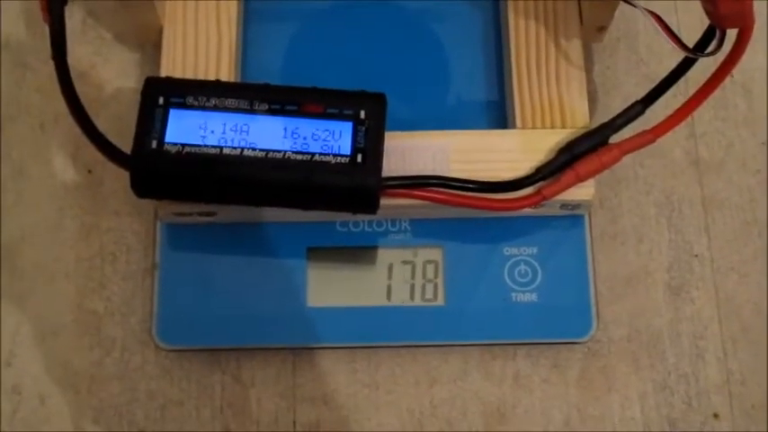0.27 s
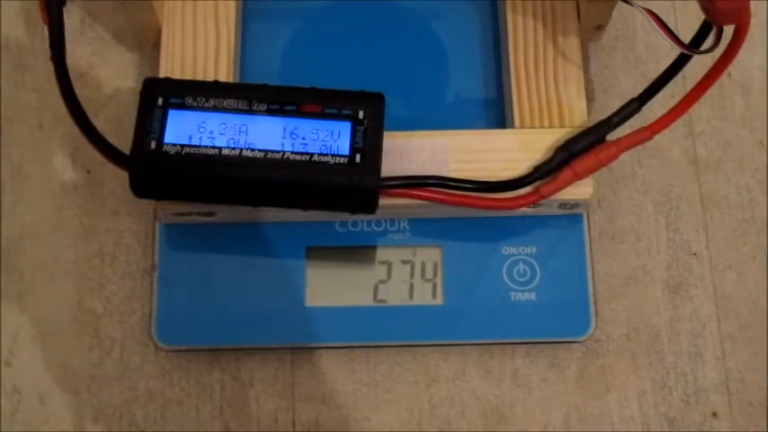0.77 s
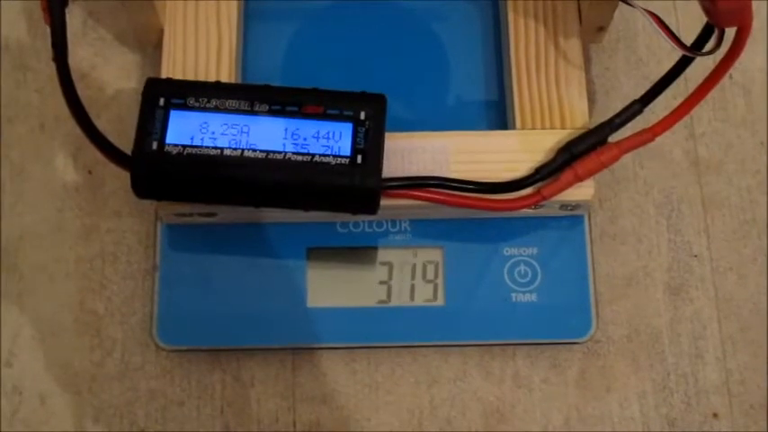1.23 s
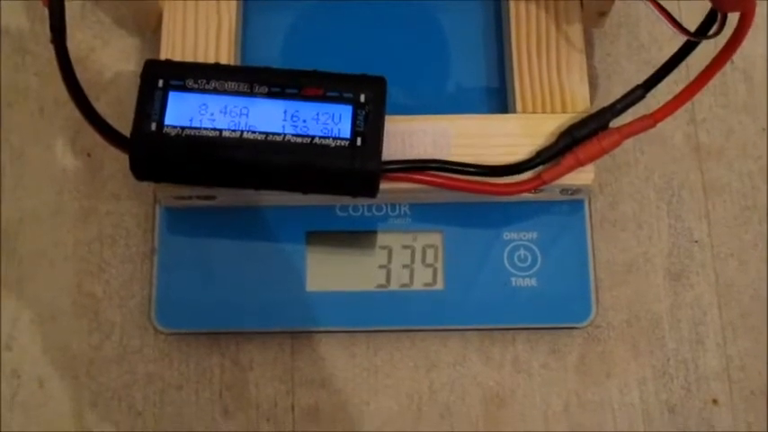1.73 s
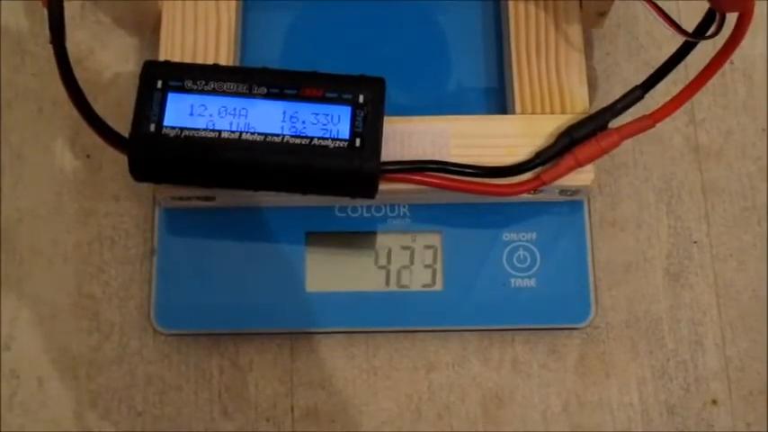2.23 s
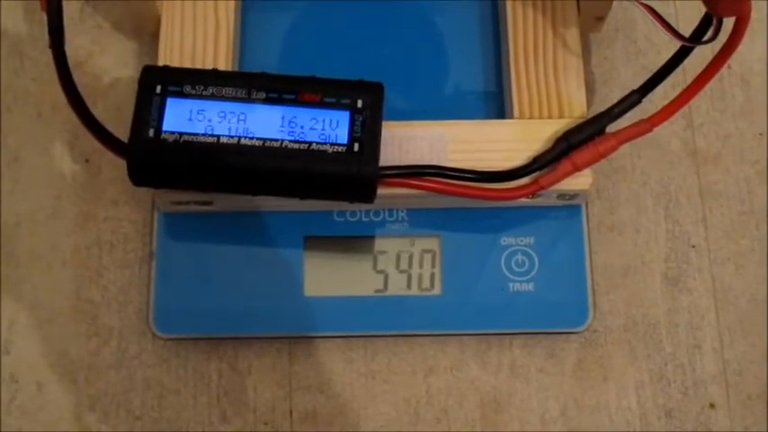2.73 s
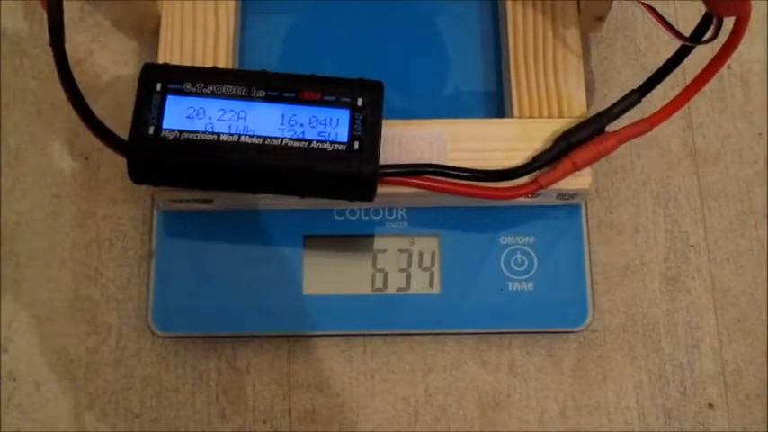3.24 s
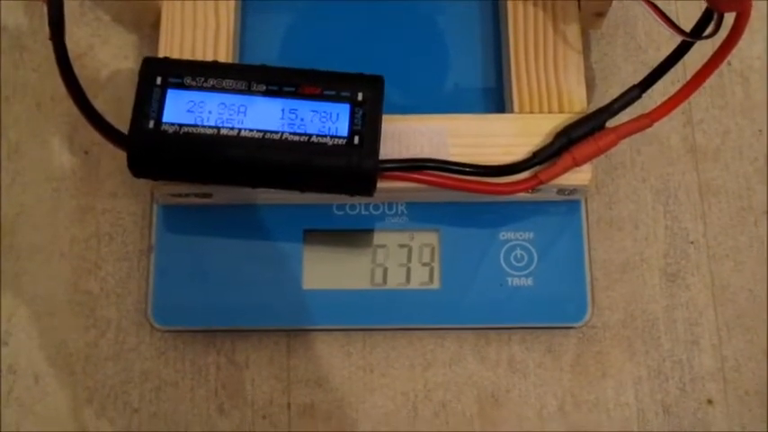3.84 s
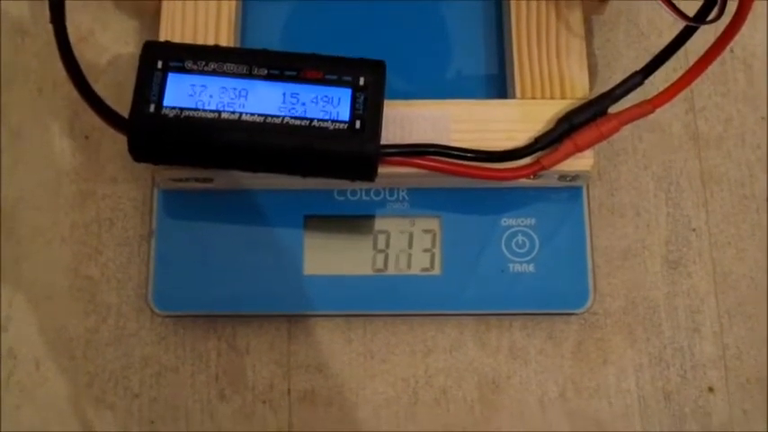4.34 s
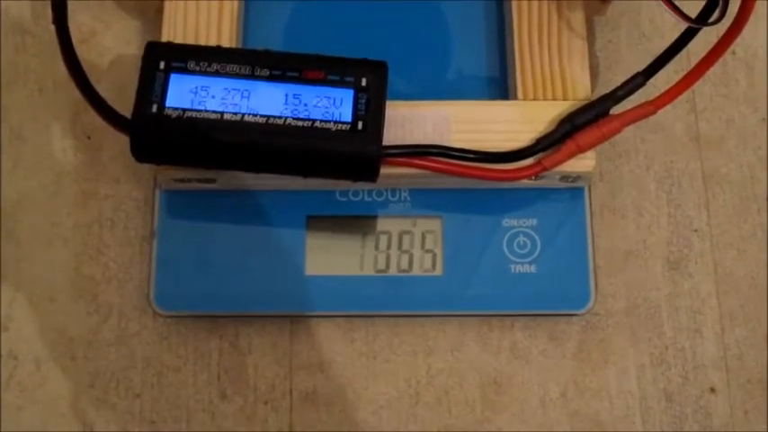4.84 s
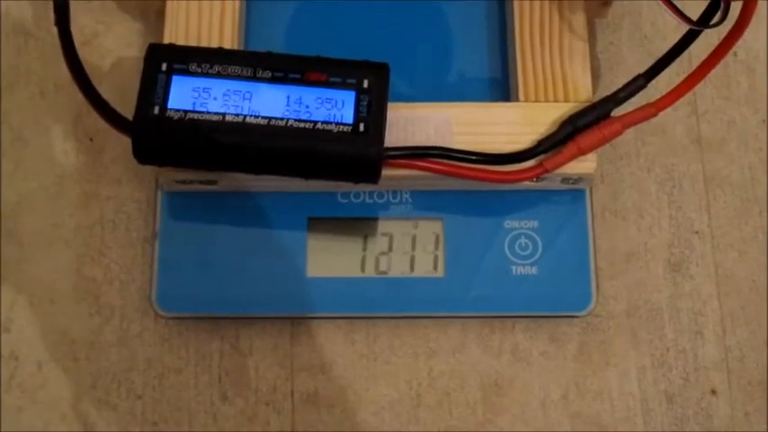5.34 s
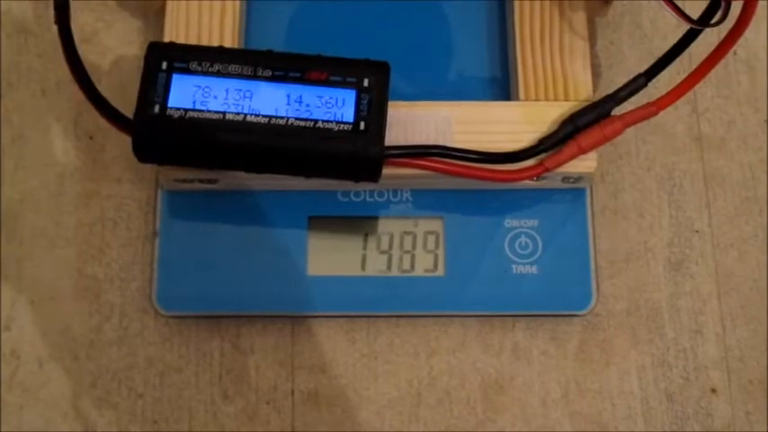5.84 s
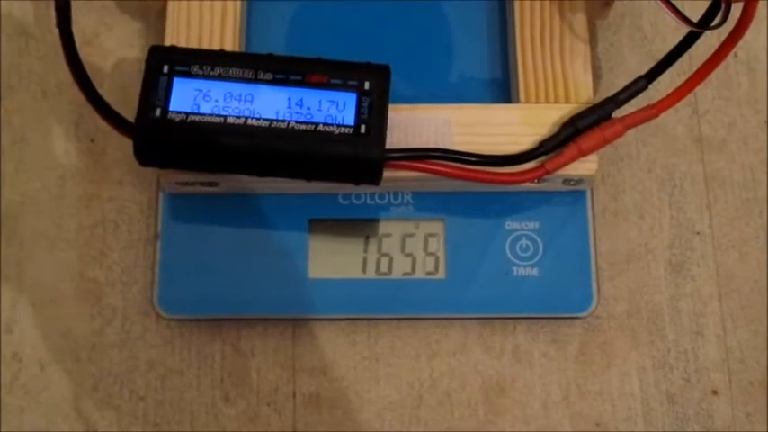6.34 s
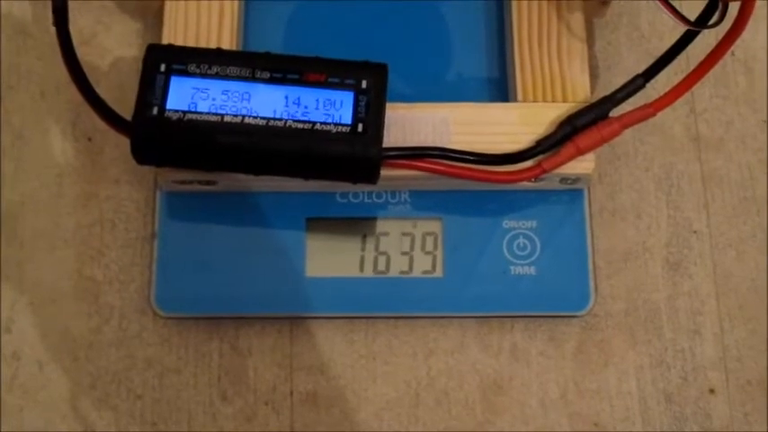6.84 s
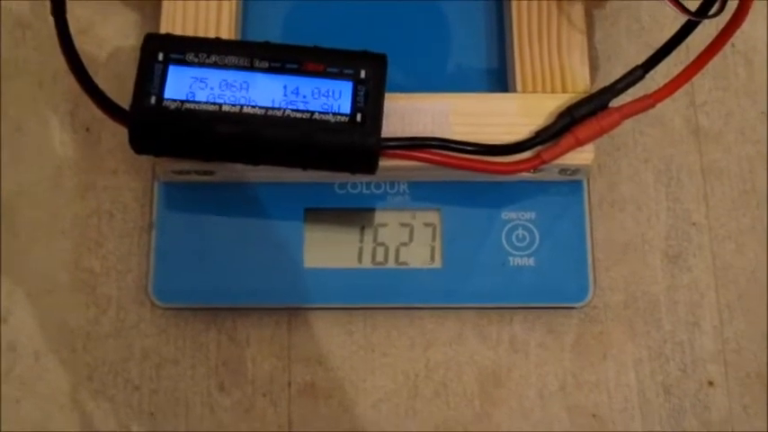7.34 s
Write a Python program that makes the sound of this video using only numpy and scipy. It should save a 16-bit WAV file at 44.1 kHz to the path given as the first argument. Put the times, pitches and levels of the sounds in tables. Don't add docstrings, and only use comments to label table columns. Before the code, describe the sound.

Close, loud sound of a small fan motor being throttled up by an uneven hand. A nasal whine with broadband air hiss lingers low while the stand chatters harshly, then sweeps upward, wavering and briefly thinning as reflections cancel the tone. From about five and a half seconds it stays at full speed, a hard shrill whine over rushing air, with no wind-down. Practically mono, little sense of the room.

```python
import sys
import numpy as np
from scipy import signal
from scipy.io import wavfile
from scipy.ndimage import uniform_filter1d

SR = 44100
rng = np.random.default_rng(int(sys.argv[2]) if len(sys.argv) > 2 else 0)


def linear_from_db(decibels):
    return 10 ** (np.asarray(decibels, float) / 20)


def unload_audio(sound):
    columns = np.transpose(np.atleast_2d(sound))
    steps = np.round(np.clip(columns, -1, 1) * 32767)
    wavfile.write(sys.argv[1], SR, steps.astype(np.int16))


N = 335160

# time [s], shaft speed [Hz], gain of the airflow noise [dB].
ROTOR = [(0, 378, 0.5), (.22, 406, 1), (.52, 432.7, 1.5), (.9, 441.3, 3), (1.24, 442.9, 2.5),
         (1.39, 476.2, 3), (1.56, 483.2, 0.5), (1.72, 502.7, 1.5), (2.36, 593, -1), (2.62, 611.3, -0.5),
         (3.15, 627, 0), (3.84, 728, 0), (4.41, 803.6, 0), (5.06, 868, 0), (5.51, 992, 1.5),
         (6.0, 994.2, 1), (7.22, 984, 1), (7.6, 991, 1)]
# time [s], shaft speed ahead or behind [Hz], half length [s].
NUDGES = [(.08, -4, 0.075), (.36, -2, 0.084), (1.88, -5, 0.11), (2.07, 3, 0.099), (2.25, -6, 0.092),
          (2.88, -5, 0.18), (3.42, -7, .1), (3.6, 5, .1), (3.98, -3, 0.094), (4.68, 2, 0.0945),
          (4.8, -5, .1), (5.2, -8, .15), (5.41, -8, 0.086), (6.3, -2, 0.19)]
# shaft speed [Hz], shaft multiples 5 and 10 [dB].
BLADE = [(378, -25, -18.5), (390, -21, -33), (413, -16, -32), (448, -17.5, -35), (505, -17.5, -27.5),
         (565, -12, -36), (616, -14.5, -34), (700, -17, -24.5), (849.6, -15.5, -20.5), (949.3, -14.5, -27),
         (982, -13, -19), (991, -13, -19.5), (1003, -1, -41)]
# shaft speed [Hz], level [dB].
THIRD_BLADE = [(378, -36), (400, -28), (425, -31), (440, -36), (595, -45), (625, -35), (832, -31),
               (960, -41), (985, -31), (995, -33)]
# shaft speed [Hz], multiples 2 and 3 from the frame [dB],
# 4 from uneven blades [dB], 7 from the mount [dB].
SHAKE = [(378, -42, -43, -37, -38), (493, -46, -28, -34.5, -34), (545, -39, -40, -30.5, -50),
         (613, -33.5, -41, -27.5, -47), (611, -33, -51, -26.5, -46), (625, -39, -48, -30.5, -41),
         (647, -37, -35, -32.5, -42), (796, -44, -49, -33, -45), (904, -44, -28, -31, -44),
         (984, -37.5, -37, -25, -45), (997, -35, -32, -26.5, -47)]
# shaft multiple, leading multiple, level relative to it [dB].
RIDERS = [(6, 4, -2), (8, 3, -10), (9, 10, -15), (11, 10, -15), (12, 10, -22), (13, 7, -19), (14, 15, -10),
          (16, 7, -18), (20, 15, -13)]
# time [s], depth [dB], half length [s].
NULLS = [(0.13, -15, 0.039), (0.242, -11, 0.05), (.45, -3, 0.049), (0.532, -4, 0.024), (0.665, -5, .05),
         (1.345, -6.5, 0.13), (1.483, -6, 0.075), (1.712, -5, 0.047), (1.848, -12, 0.095),
         (2.06, -9.5, 0.04), (2.5, -4.5, 0.19), (3.2, -2, 0.14), (3.498, -3.5, 0.082), (3.606, -13, .04),
         (3.689, -5, .04), (3.8, -11, .04), (3.905, -11, 0.068), (4.14, -12, 0.044), (4.288, -15, 0.047),
         (4.535, -20, 0.043), (4.688, -3.5, 0.13), (4.872, -4, 0.039), (4.979, -9, .05), (5.09, -4, .04),
         (5.218, -14, 0.024), (5.28, -14, 0.034), (5.37, -4, 0.028), (6.859, -4, .07), (7.319, -5, .12),
         (7.506, -4, .05)]
# time [s], change [dB], half length [s].
NULLS_2 = [(.36, -11, .08), (.56, 4, .08), (1.89, -12, 0.13), (2.16, -20, .08), (2.34, 7, .08),
           (2.61, -8, 0.11), (3.42, -8, .1), (3.92, -9, 0.16), (4.18, 5.5, .12), (4.44, -8, .12),
           (4.8, 0, .08), (5.04, -4, .08), (5.31, -4, .08), (6.0, 0.5, .2), (7.6, -4, .15)]
# shaft multiple, width [Hz], level relative to the tone [dB].
SKIRTS = [(1, 18, -22), (4, 22, -16.5), (5, 105, -13), (10, 110, -8), (15, 270, -8)]
# frequency [Hz], width [Hz], level [dB].
STAND = [(377, 26, -18), (406, 53, -17.5), (426, 27, -29.5), (462, 17, -14), (500, 29, -19), (536, 22, -25),
         (560, 23, -29.5), (627, 31, -24.5), (648.5, 33, -24), (700, 64, -28), (794, 83, -22),
         (840, 24, -20), (919.7, 106, -17), (992, 70, -14.5)]
# start [s], end [s], level [dB], rise per shaft multiple [dB].
BUZZ = [
    (0.397, 1.36, -5.5, -.5),
    (1.28, 1.88, 0.5, 0),
    (0.57, .62, -3, 0.5),
    (0.815, 0.85, 3, 0.5),
]
# frequency [Hz], width [Hz], level [dB].
FRAME = [(876, 54, -19), (1010, 80, -26.5), (1333, 76, -19.5), (1512, 190, -21.5), (1768, 66, -23.5),
         (1979, 36, -14), (2050, 110, -24.5), (2935, 240, -23.5), (3050, 130, -22), (3396, 150, -18),
         (3540, 87, -23.5), (3890, 280, -23.5), (4830, 120, -30), (5500, 700, -28.5)]
# frequency [Hz], depth [dB], half width [Hz].
HOLES = [(940, -6, 16), (980, -19, 12), (1365, -14, 29), (1850, -15, 37), (1950, -10, 23), (2947, -18, 39),
         (3044, -24, 31), (3943, -13, 45), (4450, -10, 80), (4980, -12, 63), (5000, -12, 52),
         (5310, -3, 74), (5720, -22, 160)]
# time [s], level [dB].
CAGE_DB = [(0, -50), (1.15, -50), (1.35, -45), (1.75, -45), (1.9, -60)]
# shaft speed [Hz], jet roar [dB], duct hum [dB], blade-tip hiss [dB].
AIR = [(378, -35, -22, -19), (444, -42.5, -25, -23), (590, -39, -25.5, -21), (673, -37, -27, -19.5),
       (708, -34, -24, -17.5), (915, -33, -26.5, -17), (980, -30.5, -27.5, -17.5),
       (1000, -28.5, -29.5, -19)]
# frequency [Hz], level at slow, middle and full speed [dB].
ROAR = [(20, -14, -42, -36), (70.4, 8, 2.5, 1), (158, -5.5, -2, 3), (290, -11.5, -13, 0),
        (525, -8, -13, -1), (694, -1.5, -8.5, -0.5), (1900, 1, -7.5, -0.5), (3100, -22, -42, -9.5)]
# frequency [Hz], width [Hz], level at slow speed [dB], at full speed [dB].
DUCT = [(1353, 72, -3, 3.5), (2213, 245, 4, 0), (2775, 370, 0, 4), (3230, 870, -12, -1.5)]
# frequency [Hz], level [dB].
HISS = [(1500, -14), (2500, -1.5), (3800, 3.5), (5400, 3), (6200, 4), (7200, 1), (8600, 5), (9600, 1),
        (10500, -5.5), (12000, -27)]
# frequency [Hz], level [dB].
FIZZ = [(8000, -45), (9800, -1), (10500, 2.5), (12000, 3), (13500, -1), (15000, -3), (16500, -5)]
# slow, middle and full speed [dB].
FIZZ_DB = (-10.5, -7, -10)
# time [s], frequency [Hz].
CHOP_HZ = [(0, 7725), (7.6, 7580)]
# time [s], level [dB].
CHOP_DB = [(0, -40), (3.5, -42), (4.5, -62)]
# time [s], level [dB].
BEAT_DB = [(3.4, -65), (3.6, -37), (3.74, -38), (3.9, -55), (4.2, -40), (4.5, -46), (4.8, -65)]
STRAY_WIDTH_HZ = (1100, 1900)

CAGE = 1.55
SLOW_HZ, FAST_HZ = 450, 990
EDGE_HZ = 15770


def rotor():
    t = np.arange(0, N + 64, 64) / SR
    shaft_hz = curves(ROTOR, t)[0] + bumps(NUDGES, t)
    level = harmonic_levels(t, shaft_hz)
    every_s = np.arange(N) / SR
    level = {k: np.interp(every_s, t, db) for k, db in level.items()}
    shaft_hz = np.interp(every_s, t, shaft_hz)
    turns = np.cumsum(shaft_hz) / SR
    slope = uniform_filter1d(np.gradient(shaft_hz), size=4410)
    sweep = np.clip(abs(slope) * SR / 150, 0, 1.5)
    out = np.zeros(N)
    for k, db in level.items():
        rough = np.clip(np.sqrt(k) * (.045 + .075 * sweep), 0, .9)
        heard = k * shaft_hz < 16000
        waver = np.sqrt(1 - rough ** 2) + rough * drift(width_hz=8.2)
        out += heard * tone(k * turns, db, waver)
    for k, width_hz, under_db in SKIRTS:
        skirt_db = uniform_filter1d(level[k], size=1764) + under_db
        out += tone(k * turns, skirt_db, drift(width_hz))
    return out, turns


def harmonic_levels(t, shaft_hz):
    columns = curves(BLADE, shaft_hz) + curves(THIRD_BLADE, shaft_hz) + curves(SHAKE, shaft_hz)
    level = dict(zip((5, 10, 15, 2, 3, 4, 7), columns))
    level[1] = rings(STAND, shaft_hz)
    level[5] = level[5] + bumps(NULLS, t)
    level[10] = level[10] + bumps(NULLS_2, t)
    for k, lead, under_db in RIDERS:
        level[k] = level[lead] + under_db
    for k in (2, 3, 4, 6, 7, 8, 9, 10, 11, 12, 13):
        level[k] = 10 * np.log10(linear_from_db(2 * level[k]) + chatter_power(k, t, shaft_hz))
    level[CAGE] = curves(CAGE_DB, t)[0]
    return level


def chatter_power(k, t, shaft_hz):
    edge_s = 0.052
    knocks = 0
    for start, end, db, tilt_db in BUZZ:
        fade = np.clip(np.minimum(t - start, end - t) / edge_s, 0, 1)
        knocks = knocks + linear_from_db(2 * (db + k * tilt_db)) * fade ** 2
    frame_db = rings(FRAME, k * shaft_hz) + bumps(HOLES, k * shaft_hz)
    return knocks * linear_from_db(2 * frame_db)


def air():
    frames = N // 256 + 5
    hz = np.fft.rfftfreq(1024, 1 / SR)[:, None]
    t = np.arange(frames) * 256 / SR
    shaft_hz, gain_db = curves(ROTOR, t)
    fast = np.clip((shaft_hz - SLOW_HZ) / (FAST_HZ - SLOW_HZ), 0, 1)
    shares = [np.clip(1 - abs(2 * fast - k), 0, 1) for k in range(3)]

    roar = linear_from_db(2 * sum(share * db for share, db in zip(shares, read(ROAR, hz))))
    duct = 0
    for f, width_hz, slow_db, fast_db in DUCT:
        peak = linear_from_db(2 * (slow_db + fast * (fast_db - slow_db)))
        duct = duct + peak / (1 + (2 * (hz - f) / width_hz) ** 2) ** 1.8
    hiss = linear_from_db(2 * read(HISS, hz)[0])
    fizz = linear_from_db(2 * read(FIZZ, hz)[0])

    roar_db, duct_db, hiss_db = curves(AIR, shaft_hz)
    fizz_db = hiss_db + sum(share * db for share, db in zip(shares, FIZZ_DB))
    layers = [(roar, roar_db - 0.05, 0, 700), (duct, duct_db - 1.5, 1900, 3500),
              (hiss, hiss_db - 1.53, 3500, 1e4), (fizz, fizz_db - 1.1, 1e4, 15600)]
    power = 0
    for shape, db, low, high in layers:
        band_power = (shape * ((hz > low) & (hz < high))).sum(0)
        power = power + linear_from_db(2 * db) * shape / band_power

    a, b, patches = rng.standard_normal((frames, 513, 3)).T
    patches = uniform_filter1d(patches, size=10, axis=0)
    patches = evened(uniform_filter1d(patches, size=14, axis=1))
    gusts = evened(uniform_filter1d(rng.standard_normal(frames), size=12))
    z = (a + 1j * b) * np.sqrt(power) * linear_from_db(gain_db + 0.9 * patches + 0.41 * gusts)
    unit = np.sqrt(3 / 2)
    return unit * signal.istft(z, nperseg=1024, noverlap=768)[1][:N]


def speck(since):
    return linear_from_db(-4) * np.exp(-(since / 2e-4) ** 2) * np.cos(2 * np.pi * 3500 * since)


def controller(turns):
    t = np.arange(N) / SR
    chop = np.cumsum(curves(CHOP_HZ, t)[0]) / SR
    chop_db, beat_db = curves(CHOP_DB, t)[0], curves(BEAT_DB, t)[0]
    commutation = 12 * turns
    whistle = tone(chop, chop_db, 0.88)
    octave = tone(2 * chop, chop_db - 21, 0.92)
    return whistle + octave + tone(commutation - chop, beat_db, 1)


def tone(turns, db, waver):
    phase = np.exp(2j * np.pi * (turns + rng.random()))
    return np.sqrt(2) * linear_from_db(db) * (phase * waver).real


def drift(width_hz):
    z = rng.standard_normal((N // 32 + 400, 2)) @ [1, 1j]
    r = np.exp(-np.pi * np.clip(width_hz, 1, 600) * 32 / SR)
    z = evened(signal.lfilter([1], [1, -r], z)[398:])
    return np.interp(np.arange(N) / 32, np.arange(len(z)), z)


def rings(modes, hz):
    return 10 * np.log10(sum(linear_from_db(2 * db) / (1 + (2 * (hz - f) / w) ** 2) ** 2 for f, w, db in modes))


def bumps(rows, t):
    return sum(height * np.clip(1 - abs(t - s) / half_s, 0, 1) for s, height, half_s in rows)


def curves(rows, t):
    s, *columns = np.transpose(rows)
    return [np.interp(t, s, c) for c in columns]


def read(points, hz):
    f, *columns = np.transpose(points)
    return [np.interp(np.log(hz + 1), np.log(f + 1), c) for c in columns]


def evened(x):
    return x / np.sqrt(np.mean(abs(x) ** 2) + 1e-20)


def scene():
    tones, turns = rotor()
    since = np.arange(N) / SR - .6237
    duck_db, recover_s = -3, .08
    flinch = linear_from_db(duck_db * (since > 0) * np.exp(-abs(since) / recover_s))
    mono = flinch * (tones + controller(turns) + air()) + speck(since)
    return np.tile(mono, (2, 1))


def stray_bands(mono):
    per_s, low_limit_hz, high_limit_hz = 7.1, 4400, 14600
    apart, n = np.zeros(N), np.arange(2048)
    shape = signal.windows.kaiser_bessel_derived(2048, 4 * np.pi)
    count = round(per_s * N / SR)
    for (when, where, wide), noise in zip(rng.random((count, 3)), rng.standard_normal((count, 1024))):
        at = 554 + 1024 * int(when * (N // 1024 - 3))
        low_hz = low_limit_hz + where ** 0.76 * (high_limit_hz - low_limit_hz)
        high_hz = min(low_hz + np.interp(wide, (0, 1), STRAY_WIDTH_HZ), EDGE_HZ)
        bins = np.arange(round(low_hz * 2048 / SR), round(high_hz * 2048 / SR))
        waves = shape * np.cos(np.pi / 1024 * np.outer(bins + .5, n + 1025 / 2))
        strength = np.median(abs(waves @ mono[at:at + 2048])) / 512
        apart[at:at + 2048] += strength * noise[bins] @ waves
    return apart


def top_cut(x):
    return signal.sosfilt(signal.butter(12, 16570, fs=SR, output="sos"), x)


def record(dry):
    edge = signal.firwin(401, EDGE_HZ, window=("kaiser", 8), fs=SR)
    mono = signal.oaconvolve(np.tanh(1.088 * dry[0]) / 1.091, edge, "same")
    mix = mono + linear_from_db(-.5) * stray_bands(mono) * np.array([[1], [-1]])
    return top_cut(mix)


dry = scene()
out = record(dry)
unload_audio(out)
```